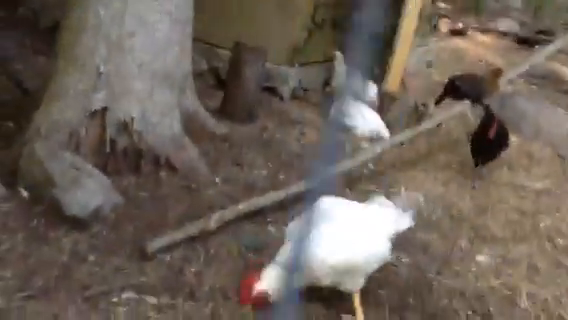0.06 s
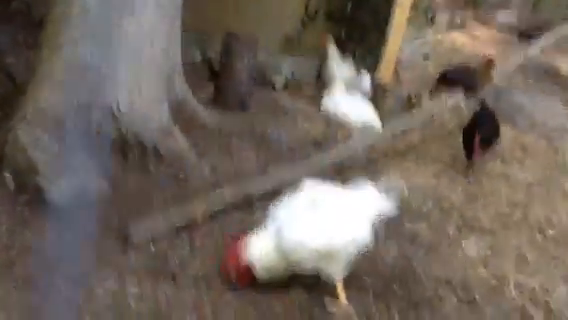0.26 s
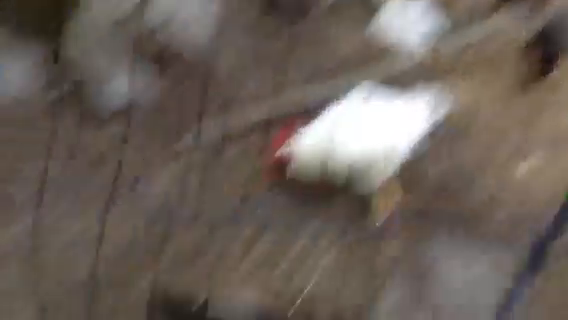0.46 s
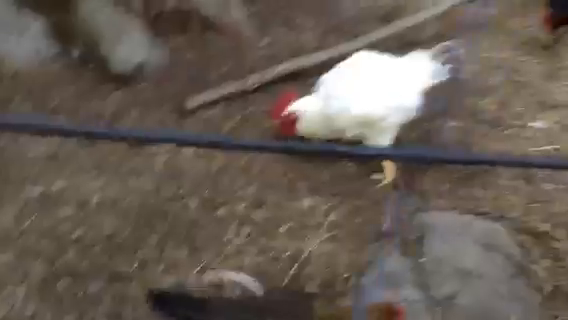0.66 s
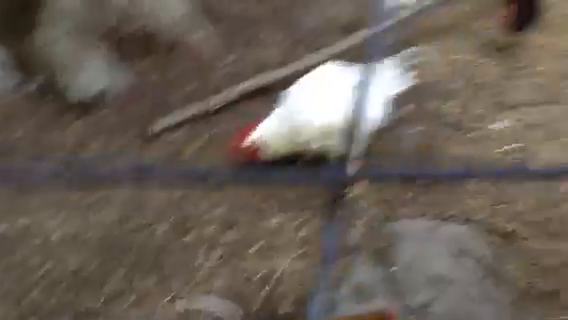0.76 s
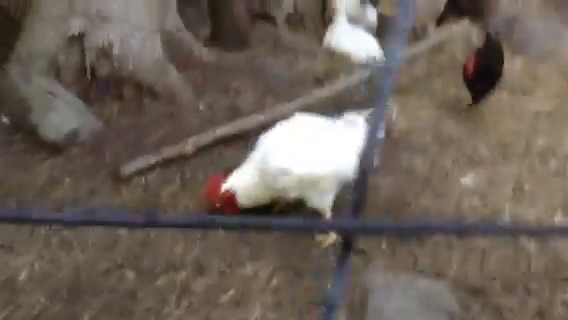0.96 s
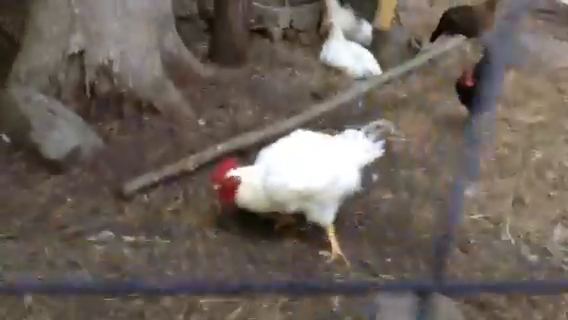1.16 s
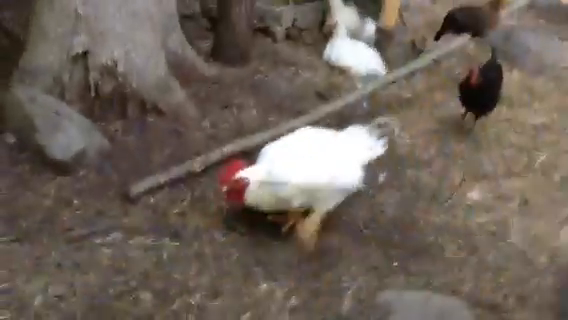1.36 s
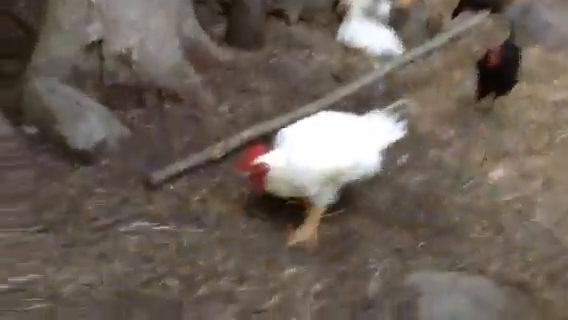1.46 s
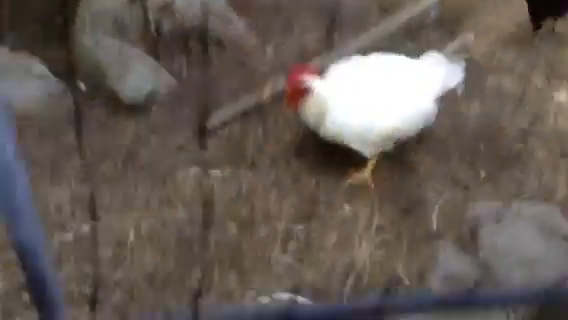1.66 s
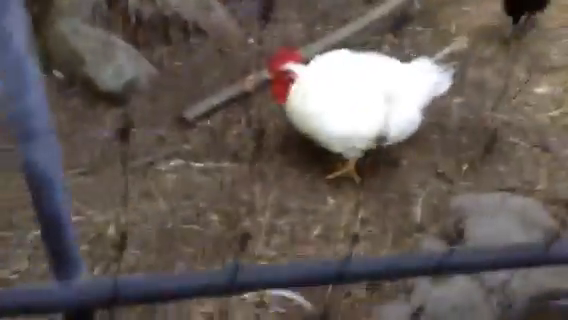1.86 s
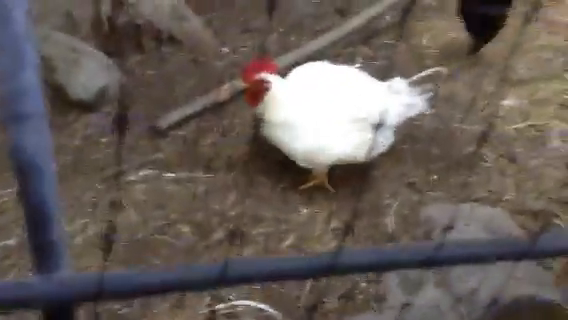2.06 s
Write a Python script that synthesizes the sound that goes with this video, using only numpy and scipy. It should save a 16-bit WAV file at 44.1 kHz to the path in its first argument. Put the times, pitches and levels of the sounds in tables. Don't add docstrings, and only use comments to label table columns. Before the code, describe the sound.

Chicken clucks, short and soft, amid crisp rustling straw and flicked grit in a yard

```python
import sys
import numpy as np
from scipy import signal
from scipy.fft import rfft, irfft
from scipy.io import wavfile

SR = 44100
rng = np.random.default_rng(int(sys.argv[2]) if len(sys.argv) > 2 else 0)


def digitize_waveform(pressure):
    field = np.atleast_2d(pressure).T
    bounded = np.clip(field, -1, 1)
    quanta = np.round(bounded * 32767).astype(np.int16)
    wavfile.write(sys.argv[1], SR, quanta)


def volts_from_decibels(level):
    exponent = np.asarray(level, float) / 20
    return 10 ** exponent


N = 92610

# f/Hz, level/dB
AIR_SPECTRUM = [(18, -87), (30, -52), (90, -16), (125, -6.5), (332, -8.5), (455, -7.5), (691, -12),
                (4660, -19), (15500, -25.5)]
# t/s, level/dB, earth level/dB
STIRRING = [(0, -63.5, -7), (0.109, -55.5, 4.5), (0.158, -44.5, 0.5), (.25, -50.5, -3.5), (.46, -51, 3),
            (.52, -53, 1), (.61, -46, -4.5), (.67, -49.5, -6.5), (.76, -59.5, 1.5), (.9, -55.5, -6),
            (.96, -43, -8), (1.019, -41.5, 0), (1.112, -53.5, -6.5), (1.4, -55, 3.5), (1.6, -54, -4),
            (1.68, -60.5, -4), (2.04, -69, -5), (2.1, -55.5, -0.5)]
# f/Hz, density/dB
STRAW_SPECTRUM = [(1000, -70), (3000, -12.5), (6000, -7), (9000, -2), (11000, 1), (13200, 2), (15500, -1.5)]
# f/Hz, density/dB
EARTH_SPECTRUM = [(150, -16), (300, 3), (700, 0), (1500, 0.5), (3000, -3), (6000, -8), (15500, -26)]
# t/s, peak level/dB, f/Hz
FOOTFALLS = [
    (0.024, -41, 680),
    (0.249, -37.5, 1150),
    (0.321, -43.5, 544),
    (1.017, -38, 590),
    (1.229, -50, 308),
    (1.307, -41, 560),
    (1.434, -49, 320),
    (1.495, -44.5, 385),
]
# t/s, peak level/dB, f/Hz, length/s
GRIT_HITS = [(.05, -44, 2150, .012), (.167, -40, 2380, .012), (.278, -38, 5300, .004),
             (.282, -45, 7300, .004), (.3, -36.5, 1092, 0.0055), (.323, -39, 1500, 0.0058),
             (.337, -41.5, 1880, 0.0054), (1.227, -40, 1260, 0.0065), (1.308, -44, 2550, .007),
             (1.309, -43, 1100, 0.0045), (1.447, -44, 1500, 0.014), (1.499, -48, 1270, 0.0056),
             (1.538, -38, 8800, .004), (.15, -45, 1470, 0.02), (.152, -32.5, 5570, 0.0061),
             (.164, -35, 4770, 0.0099), (.323, -31.5, 3760, 0.011), (.464, -37.5, 1520, 0.0056),
             (.93, -40, 2050, .015), (.957, -33, 2980, 0.01), (.962, -34, 5030, 0.01),
             (.962, -27.5, 2620, 0.013), (1.017, -37, 4550, 0.021), (1.217, -43, 6100, 0.012),
             (1.234, -38.5, 6000, 0.016), (1.304, -42, 7050, 0.015), (1.434, -43, 1300, 0.014),
             (1.439, -43, 1730, 0.01), (1.538, -34.5, 3350, 0.0093), (1.538, -40.5, 2520, 0.0052),
             (1.571, -37.5, 3200, 0.015), (1.571, -33.5, 9200, 0.0057), (1.572, -37.5, 6600, 0.0073),
             (1.5965, -36, 5940, 0.0086)]
# t/s, peak level/dB, f/Hz, length/s
STALK_SNAPS = [(.0802, -44, 10500, 0.006), (.1525, -44, 12800, 0.002), (.215, -37, 13500, .002),
               (.234, -28.5, 13600, .004), (.2812, -31, 13300, 0.0015), (.283, -28, 12500, .006),
               (.2885, -34, 13500, .002), (.3115, -31, 13000, .003), (.319, -36, 12000, 0.0023),
               (.337, -42, 11000, 0.006), (.3228, -25.5, 12700, 0.004), (.324, -29, 13300, 0.0057),
               (.355, -43, 10500, .002), (.372, -36, 12500, 0.003), (.381, -35, 13800, 0.0038),
               (.443, -32.5, 12000, 0.0036), (.505, -40, 14000, .004), (.576, -40, 10200, 0.004),
               (.612, -37, 9100, 0.008), (.654, -33, 12300, 0.0057), (.871, -39, 12000, .005),
               (.9452, -24.5, 14100, 0.0025), (1.006, -27, 11400, 0.0071), (1.018, -28, 9300, 0.014),
               (1.041, -39, 13900, 0.0021), (1.06, -39, 10500, 0.0034), (1.076, -24, 13000, 0.0032),
               (1.0835, -33, 11000, .002), (1.088, -31.5, 14000, 0.0045), (1.127, -33.5, 10400, 0.0015),
               (1.161, -45, 11000, .003), (1.198, -45, 11100, 0.0047), (1.211, -49, 11300, .004),
               (1.218, -34, 11400, 0.0033), (1.231, -39, 11000, 0.0034), (1.235, -40, 12000, 0.0045),
               (1.25, -38, 12500, .004), (1.254, -42, 9700, .005), (1.275, -37, 12400, .003),
               (1.2975, -49, 13600, 0.0037), (1.305, -37, 13500, 0.0072), (1.375, -36, 12000, .004),
               (1.379, -39, 12500, 0.009), (1.467, -50, 12700, .006), (1.5717, -32, 13700, 0.0037),
               (1.775, -46, 12000, .004), (1.904, -52, 12000, .004), (2.064, -49, 13000, .02)]
# t/s, peak level/dB, f/Hz, decay by 60 dB/s
HARD_STALK = (.2812, -23, 13200, .0016)
# t/s, f/Hz, level/dB
FIRST_SWOOP = [
    (.124, 1154, -60),
    (.156, 1400, -56.5),
    (.163, 1354, -58),
    (.167, 1119, -41.5),
    (.171, 820, -40.5),
    (.174, 500, -28.5),
    (.177, 429, -27.5),
    (.181, 342, -35.5),
    (.186, 300, -63),
]
SECOND_SWOOP = [
    (.910, 1109, -52),
    (.917, 1269, -47),
    (.923, 1342, -50.5),
    (.929, 1180, -41),
    (.932, 988, -40.5),
    (.934, 720, -40),
    (.937, 595, -27.5),
    (.941, 415, -35),
    (.946, 330, -45),
]
# t/s, f/Hz, level/dB
HELD_CLUCK = [
    (1.161, 697, -48),
    (1.166, 632, -45.5),
    (1.171, 622, -38),
    (1.177, 635, -40),
    (1.182, 658, -42),
    (1.187, 586, -34),
    (1.192, 590, -43),
    (1.197, 627, -56),
    (1.204, 617, -45),
]
# t/s, length/s, first f/Hz,
# last f/Hz, level/dB
LOW_NOTES = [(.129, 0.01, 295.3, 386, -43.5), (.141, 0.0088, 370, 434, -49.5),
             (.187, 0.0085, 433.6, 382, -44), (.2, .012, 404.6, 385, -80), (.835, 0.0068, 507, 517, -51),
             (.89, 0.019, 318.6, 425, -37), (.958, 0.016, 619, 463, -56.5), (1.39, 0.027, 220, 200, -67),
             (1.45, 0.019, 200, 170, -58.5), (1.52, 0.058, 180, 155, -59.5),
             (1.575, 0.045, 200, 217, -61), (1.965, 0.034, 367, 343, -59.5),
             (2.082, 0.026, 270, 298, -54)]
# t/s, length/s, first f/Hz, last f/Hz, level/dB
EXTRA_NOTES = [
    (.172, 0.012, 806, 830, -43.5),
    (.898, 0.021, 639, 735, -44),
    (1.171, 0.014, 444, 452, -44),
    (1.179, 0.01, 329.3, 300, -45),
    (1.187, 0.0095, 449.5, 383, -47),
]
# delay t/s, level/dB
REFLECTIONS = [
    (.013, -23.5),
    (.028, -22.5),
    (.047, -28),
]
# f/Hz, decay by 60 dB/s, lag t/s
BRANCH_MODES = [
    (1400, 0.0062, .0016),
    (1084, 0.0061, 0.002393),
    (720, 0.011, 0.0036),
    (560, .016, 0.0035),
    (322, 0.019, 0.0039),
    (200, 0.025, 0.0034),
]
BRANCH_LEVELS = [0, 9, -7, -5.5, -3, -6]
# f/Hz, level/dB, decay by 60 dB/s
BEAK_MODES = [
    (3780, 1, 0.0033),
    (2820, -3.5, 0.0039),
    (1950, -3.5, 0.0062),
]
# t/s, length/s, level/dB
FAR_CHIRR = [
    (1.368, .032, -68.5),
    (1.4, .025, -72),
    (1.428, .042, -69.5),
    (1.47, .03, -71),
]
# t/s, length/s, level/dB
NEAR_CHIRR = [
    (1.593, .047, -69),
    (1.636, .02, -64),
    (1.661, .025, -67),
    (1.684, .025, -62),
    (1.716, .018, -68),
    (1.732, .03, -67),
    (1.771, .034, -69),
    (1.801, .027, -69.5),
    (1.825, .019, -68),
    (1.849, .025, -68),
]


def unit_rms(x):
    return x / np.sqrt(np.mean(x ** 2) + 1e-20)


def drift(rate_hz):
    r = np.exp(-2 * np.pi * rate_hz / SR)
    noise = rng.standard_normal(N + SR)
    return unit_rms(signal.lfilter([1], [1, -2 * r, r * r], noise)[SR:])


def colour(x, spectrum):
    hz, db = np.transpose(spectrum)
    grid = np.fft.rfftfreq(len(x), 1 / SR) + 1
    gain = volts_from_decibels(np.interp(np.log(grid), np.log(hz), db))
    return unit_rms(irfft(rfft(x) * gain, len(x)))


def air():
    level_db = -59.5 + 0.083 * drift(5.4)
    return volts_from_decibels(level_db) * colour(rng.standard_normal(N), AIR_SPECTRUM)


def crackle(spectrum, clump_db):
    grains_per_s, spread_db = 900, 4.5
    struck = rng.random(N) < grains_per_s * volts_from_decibels(clump_db) / SR
    sizes = volts_from_decibels(spread_db * np.minimum(rng.exponential(1, N), 4)) * struck
    decay = volts_from_decibels(-60 / (0.006 * SR))
    grains = signal.lfilter([1], [1, -decay], sizes) * rng.standard_normal(N)
    hiss = volts_from_decibels(-3 + clump_db) * colour(rng.standard_normal(N), spectrum)
    return hiss + volts_from_decibels(-5.5) * colour(grains, spectrum)


def straw():
    s, db, earth_db = np.transpose(STIRRING)
    t = np.arange(N) / SR
    clump_db = 1.9 * drift(25)
    earth = volts_from_decibels(-7 + np.interp(t, s, earth_db)) * crackle(EARTH_SPECTRUM, clump_db)
    stalks = crackle(STRAW_SPECTRUM, clump_db)
    return volts_from_decibels(np.interp(t, s, db)) * (stalks + earth)


def ring(s, db, hz, t60):
    start = int(s * SR)
    out, t = np.zeros(N), np.arange(N - start) / SR
    out[start:] = volts_from_decibels(db - 60 * t / t60) * np.sin(2 * np.pi * hz * t)
    return out


def steps():
    thuds = np.zeros(N)
    for s, db, hz in FOOTFALLS:
        t60 = 6 / hz
        thuds += ring(s, db, hz, t60) + ring(s, db - 30, hz * 2.56, t60)
    return signal.lfilter([.25], [1, -.75], thuds)


def fractures(rows, puff_db, cut_hz, cycles):
    out, t = np.zeros(N + SR), np.arange(SR // 10) / SR
    high_pass = signal.butter(3, cut_hz, "high", fs=SR, output="sos")
    noise = rng.standard_normal((len(rows), 2, len(t)))
    for (s, db, hz, length), (puff, shake) in zip(rows, noise):
        fade = volts_from_decibels(-40 * t / length) * np.minimum(t / (0.084 * length), 1)
        r, w = volts_from_decibels(-60 * hz / (cycles * SR)), 2 * np.pi * hz / SR
        force = (shake + 2 * (t < 1 / SR)) * fade
        tone = signal.lfilter([1, 0, -1], [1, -2 * r * np.cos(w), r * r], force)
        puff = signal.sosfilt(high_pass, puff * fade)
        event = volts_from_decibels(puff_db) * puff / abs(puff).max() + volts_from_decibels(-3) * tone / abs(tone).max()
        out[int(s * SR):][:len(t)] += volts_from_decibels(db - 3) * event
    return out[:N]


def grit():
    return fractures(GRIT_HITS, puff_db=-12, cut_hz=1300, cycles=11)


def snaps():
    return fractures(STALK_SNAPS, puff_db=0, cut_hz=8500, cycles=18) + ring(*HARD_STALK)


def voice(hz, gain, octave_db):
    phase = 2 * np.pi * np.cumsum(hz * (1 + 0.0344 * drift(108))) / SR
    return np.sqrt(2) * gain * (np.sin(phase) + volts_from_decibels(octave_db) * np.sin(2 * phase))


def glide(rows, octave_db):
    s, hz, db = np.transpose(rows)
    t = np.arange(N) / SR
    edge = np.clip(np.minimum(t - s[0], s[-1] - t) / .003, 0, 1)
    return voice(np.interp(t, s, hz), edge * volts_from_decibels(np.interp(t, s, db)), octave_db)


def notes(rows, octave_db):
    out, t = np.zeros(N), np.arange(N) / SR
    for s, length, first_hz, last_hz, db in rows:
        swell = np.interp(t, [s, s + 0.087 * length, s + length * 1.17], [0, 1, 0])
        gain = volts_from_decibels(db) * np.sin(np.pi / 2 * swell)
        hz = np.interp(t, [s, s + length], [first_hz, last_hz])
        out += voice(hz, gain, octave_db)
    return out


def hens():
    direct = glide(FIRST_SWOOP, -21) + glide(SECOND_SWOOP, -21) + glide(HELD_CLUCK, -30)
    direct = direct + notes(LOW_NOTES, -11) + notes(EXTRA_NOTES, -21)
    out = direct.copy()
    for s, db in REFLECTIONS:
        delay = int(s * SR)
        out[delay:] += volts_from_decibels(db) * direct[:N - delay]
    return out


def knock():
    knock_s, knock_db = .5366, -30
    tick = sum(ring(knock_s - .0002, knock_db + db, hz, t60) for hz, db, t60 in BEAK_MODES)
    tick = tick + volts_from_decibels(-1.5) * np.roll(tick, int(.00103 * SR))
    blunt = signal.butter(4, 4300, fs=SR, output="sos")
    tick = signal.sosfilt(blunt, tick) + volts_from_decibels(-19) * tick
    branch = np.zeros(N)
    for (hz, t60, lag), db in zip(BRANCH_MODES, BRANCH_LEVELS):
        branch += ring(knock_s + lag, knock_db + db, hz, t60)
    return branch - tick


def cricket(bursts, pitch_hz, wander):
    t, gate = np.arange(N) / SR, np.zeros(N)
    for s, length, db in bursts:
        gate += volts_from_decibels(db) * np.interp(t, [s, s + .004, s + 0.85 * length, s + length], [0, 0.8, 1, 0])
    first_s = bursts[0][0]
    hz = pitch_hz * (1 + wander * drift(66)) - np.interp(t, [first_s, first_s + 0.036], [120, 0])
    throb = volts_from_decibels(2.0 * drift(50))
    return gate * throb * np.sqrt(2) * np.sin(2 * np.pi * np.cumsum(hz) / SR)


def scene():
    near = straw() + steps() + grit() + snaps() + hens() + knock()
    near = near + cricket(FAR_CHIRR, 6400, wander=.007) + cricket(NEAR_CHIRR, 4750, wander=.003)
    near = signal.sosfilt(signal.butter(6, 187, "high", fs=SR, output="sos"), near)
    return (near + air())[None]


def top_cut(x):
    return signal.sosfilt(signal.butter(12, 16040, fs=SR, output="sos"), x)


def record(dry):
    low_pass = signal.cheby2(16, 30.0, 15600, fs=SR, output="sos")
    mix = signal.sosfilt(low_pass, dry)
    return top_cut(mix)


dry = scene()
out = record(dry)
digitize_waveform(out)
```